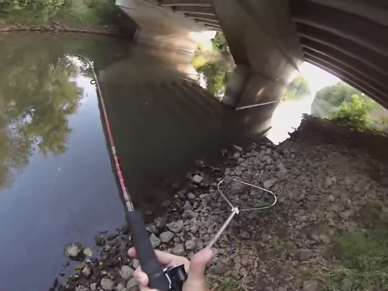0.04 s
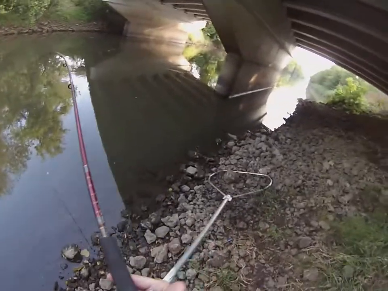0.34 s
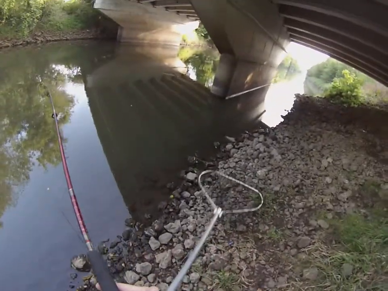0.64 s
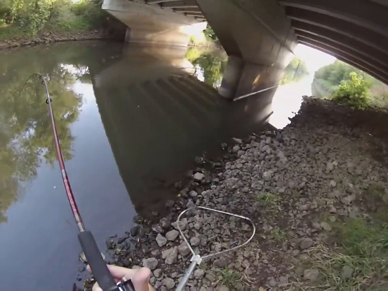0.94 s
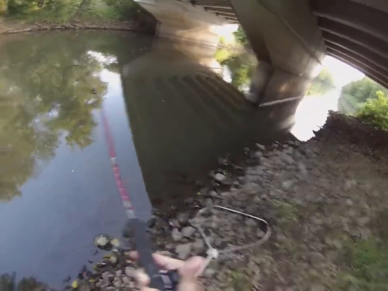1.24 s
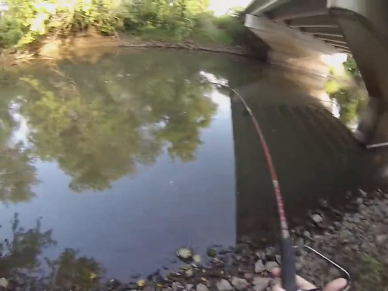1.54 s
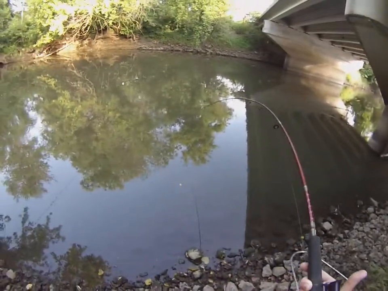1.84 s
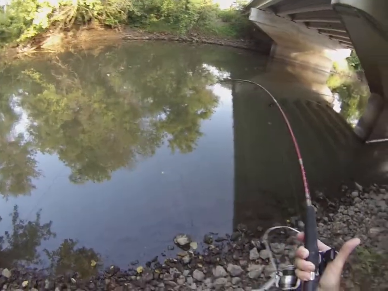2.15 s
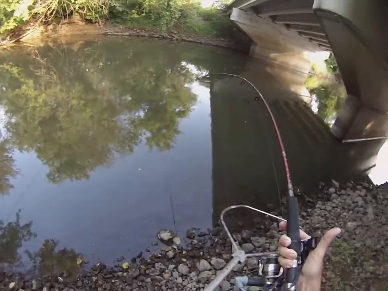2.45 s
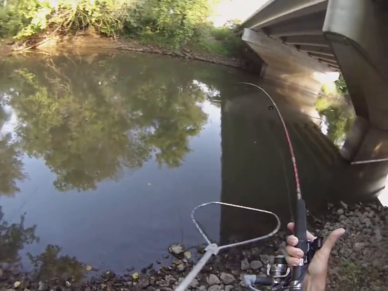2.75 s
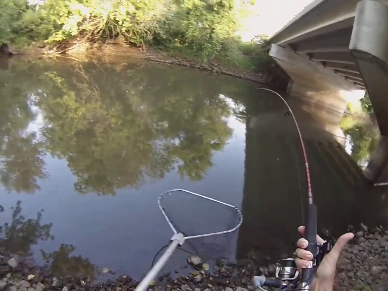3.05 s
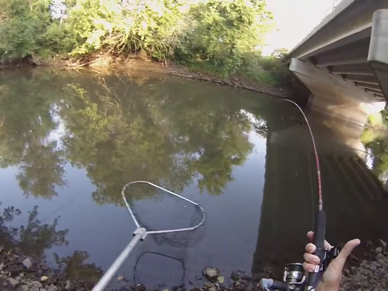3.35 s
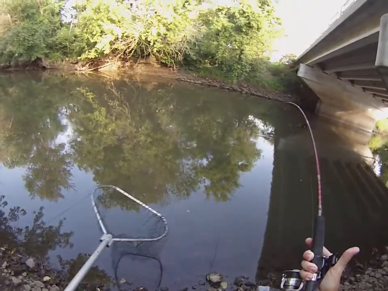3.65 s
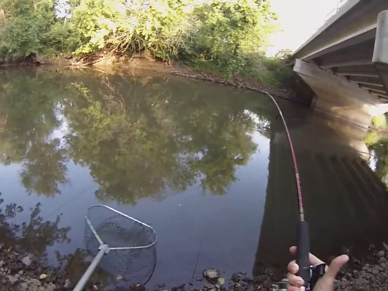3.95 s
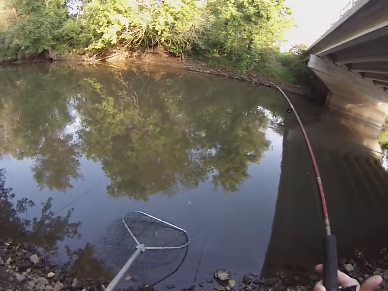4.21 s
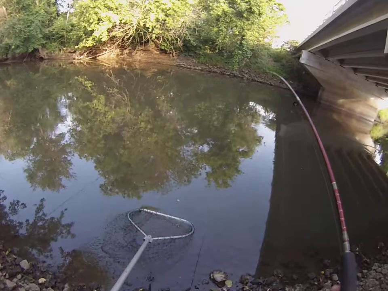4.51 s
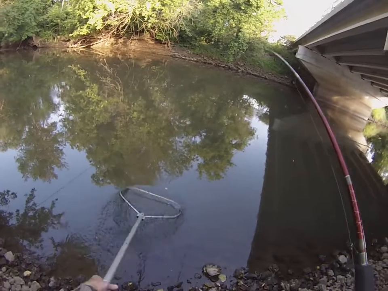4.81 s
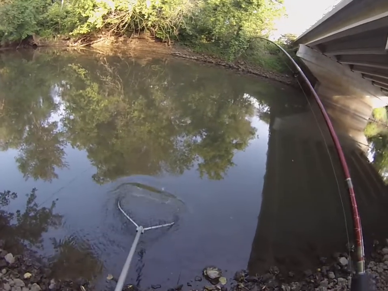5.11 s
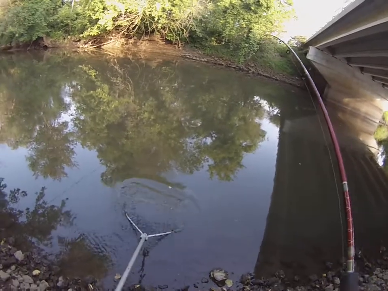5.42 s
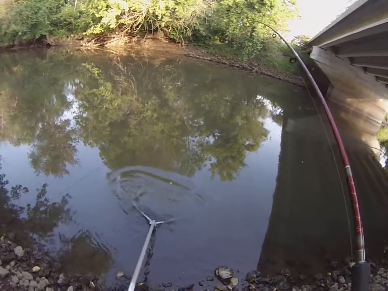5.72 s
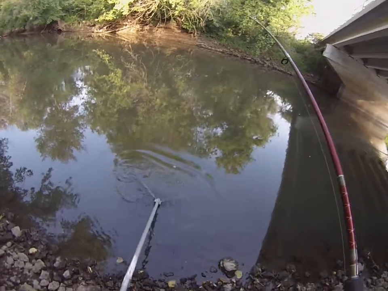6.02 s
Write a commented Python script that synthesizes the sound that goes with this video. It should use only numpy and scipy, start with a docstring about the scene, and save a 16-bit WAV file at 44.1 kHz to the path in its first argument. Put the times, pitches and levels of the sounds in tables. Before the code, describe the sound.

Close, sharp knocks and gritty scrapes come first as a landing net's hoop bumps across gravel beside a concrete bridge, with a slight echo. Tyre noise dies away and a breeze brushes the microphone. A quieter stretch holds soft fishing reel ticks, pebble clicks and faint distant birds, followed by a light splash with bubbles and several clacks of the metal pole.

```python
"""A landing net on a metal pole is dragged and knocked over riverbank stones, then dipped in the water.
Its hoop rattles in the socket, the mesh splashes and sheds bubbles, the pole clacks in the hand,
and a fishing reel's pawl ticks. A concrete bridge echoes every knock while its road noise fades.
Faint birds and an insect call from the far bank; a breeze puffs on the microphone."""
import sys
import numpy as np
from scipy import signal
from scipy.fft import rfft, irfft, next_fast_len
from scipy.io import wavfile
from scipy.ndimage import map_coordinates

SR = 44100
rng = np.random.default_rng(int(sys.argv[2]) if len(sys.argv) > 2 else 0)


def put_to_file(sound):
    """Save the sound as 16-bit audio at rate SR, in the file named by the first command-line argument."""
    columns = np.atleast_2d(sound).T  # one column per channel
    safe = np.clip(columns, -1, 1)
    whole_steps = np.round(safe * 32767)
    wavfile.write(sys.argv[1], SR, whole_steps.astype(np.int16))


N = 272095
TIME = np.arange(N) / SR
AGE = np.arange(SR // 2) / SR  # time since onset [s]


def amp(db):
    """Decibels to gain."""
    return 10 ** (np.asarray(db) / 20)


def unit(x):
    """Scale to rms 1."""
    return x / np.sqrt(np.mean(x ** 2) + 1e-20)


def along(points, hz):
    """Interpolate (frequency [Hz], value) on a log axis."""
    f, v = np.transpose(points)
    return np.interp(np.log(hz + 1), np.log(f + 1), v)


def gain_curve(rows):
    """(time [s], level [dB]) to gain per sample."""
    return amp(np.interp(TIME, *np.transpose(rows)))


def strokes(rows, attack_s, t60_s):
    """Rise-hold-decay gain from (start [s], length [s], level [dB])."""
    return sum(np.clip((TIME - s) / attack_s, 0, 1)
               * amp(db - 60 * np.maximum(TIME - s - length_s, 0) / t60_s) for s, length_s, db in rows)


def wobble(rate_hz):
    """Smooth random curve with knots at rate_hz."""
    return map_coordinates(rng.standard_normal(int(N * rate_hz / SR) + 4), [TIME * rate_hz])


def tone(pitch_hz):
    """Sine following a pitch curve."""
    return np.sin(2 * np.pi * np.cumsum(pitch_hz) / SR)


def add(track, s, sound):
    """Mix a sound in at time s."""
    part = track[max(round(s * SR), 0):][:len(sound)]
    part += sound[:len(part)]


def coloured(x, level_db):
    """Minimum-phase filter with gain level_db(hz)."""
    m = 2 * next_fast_len(len(x))
    cepstrum = irfft(level_db(np.fft.rfftfreq(m, 1 / SR)) * np.log(10) / 20)
    cepstrum[1:m // 2] *= 2
    cepstrum[m // 2 + 1:] = 0
    return irfft(rfft(x, m) * np.exp(rfft(cepstrum)))[:len(x)]


def shaped(x, spectrum):
    """Filter by (frequency [Hz], gain [dB]), then scale to rms 1."""
    return unit(coloured(x, lambda hz: along(spectrum, hz)))


def noise(spectrum):
    """Shaped Gaussian noise, rms 1."""
    return shaped(rng.standard_normal(N), spectrum)


def grains(size, spread_db):
    """Tiny slips of very unequal strength."""
    slips = rng.standard_normal(size)
    strength_db = spread_db * np.repeat(rng.standard_normal(size // 16 + 1), 16)[:size]
    return unit(slips * amp(strength_db))


def ring(modes):
    """Decaying modes, struck at new strengths each time."""
    strengths_db = rng.uniform(-2, 2, len(modes))
    return sum(amp(db + strength_db - 60 * AGE / t60_s) * np.sin(2 * np.pi * (hz * AGE + rng.random()))
               for (hz, db, t60_s), strength_db in zip(modes, strengths_db))


def contact(spectrum, t60_s, snap, uneven_db, body_db=0, edge_db=0):
    """A snap, then dying slips; body sets the lows, edge the treble. Each spot has its own resonances."""
    chatter = grains(len(AGE), spread_db=2.5) * amp(-60 * AGE / t60_s)
    chatter /= np.linalg.norm(chatter)
    chatter[0] += snap
    tilt = [(1200, body_db), (2000, 0.014), (3800, 0), (5500, edge_db)]
    spot_hz = np.arange(0, SR / 2, 300)
    spot_db = uneven_db * rng.standard_normal(len(spot_hz))
    hit = coloured(chatter,
                   lambda hz: along(spectrum, hz) + along(tilt, hz) + np.interp(hz, spot_hz, spot_db))
    return hit / np.std(hit[:SR // 200])  # rms 1 over the attack


def echo(x, decay, onset_s):
    """Diffuse tail; each frequency dies at its own rate."""
    hz, t, bands = signal.stft(rng.standard_normal(2 * SR), SR, nperseg=256)
    tail = signal.istft(bands * amp(-60 * t / along(decay, hz)[:, None]), SR, nperseg=256)[1]
    tail *= 1 - np.exp(-np.arange(len(tail)) / SR / onset_s)
    return signal.fftconvolve(x, tail / np.linalg.norm(tail))[:N]


def breeze():
    """Puffs buffet the microphone over steady open-air noise."""
    # puffs of air: (start [s], length [s], level [dB])
    puffs = [(0, 1.4, -52), (1.27, 0.32, -43), (1.635, 0.027, -41), (1.75, 0.056, -44), (1.9, 1.1, -62.5)]
    # buffeting and open-air spectra: (frequency [Hz], density [dB])
    buffet = [(12, -38), (22, 0), (45, 5), (81, -6), (134, 0.5), (214, -5), (409, -11.5), (500, -19.5),
              (650, -38), (1100, -120)]
    air = [(12, -42), (25, -1), (60, -8.5), (100, -5), (140, -9.5), (250, -13), (500, -16), (950, -17.5),
           (1500, -22.5), (2100, -24), (2700, -25.5), (3600, -25.5), (6000, -30.5), (9000, -37.5),
           (15500, -44)]
    gusts = strokes(puffs, attack_s=0.027, t60_s=0.44) * amp(2.0 + 2.26 * wobble(14))
    return gusts * noise(buffet) + amp(-57) * noise(air)


def traffic():
    """Fading tyre noise and a distant engine's firing drone."""
    # tyre spectrum: (frequency [Hz], density [dB])
    road = [(88, -42), (150, -15.5), (225, -14), (515, -11), (687, -6.5), (772, -4.5), (936, -1),
            (1430, -12.5), (1950, -11), (2860, -26), (3670, -27), (6430, -34), (15000, -60.5)]
    # tyre loudness: (time [s], level [dB])
    fade = [(0.0, -35), (0.46, -36), (0.88, -35.5), (0.99, -36), (1.56, -40), (2.11, -50), (3.63, -56.5),
            (5.07, -55.5), (6.17, -62)]
    tyres = gain_curve(fade) * amp(0.5 + 0.7 * wobble(5.09)) * noise(road)
    firing_hz = 90 + 1.47 * wobble(12)
    drone = tone(firing_hz) * amp(1.5 * wobble(10))
    return tyres + drone * gain_curve([(0, -58), (3, -58.5), (5.1, -54.5), (6.1, -61.5)])


def birds(syllable_hz=23):
    """Distant birds whistle short glides, twitter and lisp."""
    # whistles: (start [s], length [s], start pitch [Hz], end pitch [Hz], level [dB])
    notes = [(2.865, 0.049, 2844, 2510, -53), (3.057, 0.062, 2880, 2520, -51.5),
             (3.204, 0.11, 2060, 1974, -57), (4.147, 0.095, 3350, 3320, -60.5),
             (4.569, 0.043, 2400, 3100, -50.5), (4.663, 0.098, 4650, 3840, -61),
             (4.75, 0.064, 2960, 3355, -50.5), (4.911, 0.045, 3350, 3130, -52.5),
             (4.948, 0.06, 3030, 3090, -51.5)]
    # twitters and thin, high calls: (start [s], length [s], level [dB])
    twitters = [(3.12, 0.28, -59.5), (3.56, 0.062, -57.5)]
    lisps = [(3.39, 0.06, -73), (3.58, 0.054, -76)]
    out = np.zeros(N)
    for s, length_s, start_hz, end_hz, db in notes:
        progress = np.linspace(0, 1, int(length_s * SR))
        glide_hz = start_hz + (end_hz - start_hz) * progress
        waver = 1 + 0.018 * wobble(196)[:len(progress)]
        add(out, s, amp(db - 3.5) * np.sin(np.pi * progress) * tone(glide_hz * waver))
    twitter = tone(3500 + 330 * wobble(140)) * np.sin(np.pi * syllable_hz * TIME) ** 4
    out += twitter * strokes(twitters, attack_s=0.049, t60_s=0.4)
    lisp = noise([(6500, -54), (7600, -4), (8300, -9), (9200, -70)])
    return out + lisp * strokes(lisps, attack_s=0.037, t60_s=0.35)


def insect(pulse_hz=21):
    """An insect pulses on one narrow band."""
    # warm-up: (time [s], level [dB])
    swell = [(3.5, -94), (5.3, -78), (6.1, -83)]
    band = noise([(4900, -68), (5350, -1), (5550, 3), (6000, -56)])
    return band * (1 + 0.48 * np.sin(2 * np.pi * pulse_hz * TIME)) * gain_curve(swell)


def reel(tick_db=-44, scatter_db=2.8):
    """Pulled line spins the spool, which runs down; the pawl drops once a tooth and its spring rings."""
    # spool speed: (time [s], rate [teeth/s])
    spool = [(1.848, 17), (2.128, 27.6), (2.27, 27.4), (2.486, 19.5), (2.65, 10.5), (3.03, 3.5)]
    # one-tooth slips: (time [s], level [dB])
    tugs = [(3.467, -42.5), (3.926, -43), (4.002, -43), (4.0378, -43), (4.572, -46.5), (5.598, -46)]
    # spring modes: (frequency [Hz], level [dB], t60 [s])
    spring = [(3870, -12, 0.25), (4960, -7, 0.049), (6160, -2, .012), (7040, -12, .22), (7540, -4, 0.013)]
    pawl = [(2000, -21), (4500, -5.5), (7000, -5), (9000, -19), (15000, -21)]
    teeth = np.cumsum(np.interp(TIME, *np.transpose(spool), left=0, right=0)) / SR
    drops_s = TIME[1:][np.diff(np.ceil(teeth)) > 0]
    ticks = [(s, tick_db + scatter_db * rng.standard_normal()) for s in drops_s]
    out = np.zeros(N)
    for s, db in ticks + tugs:
        click = contact(pawl, t60_s=0.0074, snap=0.77, uneven_db=2)
        add(out, s, amp(db - 14.5) * click + amp(db - 12) * ring(spring))
    return out


def bubble(hz, rise_oct):
    """Trapped air rings, climbing in pitch near the surface; low or far-climbing bubbles last longer."""
    t60_s = 0.042 * (hz / 1000) ** -0.7 * (1 + 0.35 * rise_oct)
    pitch_hz = hz * 2 ** (rise_oct * np.minimum(AGE / t60_s, 1))
    return amp(-60 * AGE / t60_s) * (1 - np.exp(-AGE / 0.0033)) * tone(pitch_hz)


def water(small_bubbles=70):
    """The mesh slaps through the surface, flicks spray and sheds bubbles."""
    # mesh slaps: (start [s], length [s], level [dB])
    slaps = [(4.35, 0.077, -54), (4.422, 0.021, -51.5), (4.462, 0.025, -48), (4.565, 0.032, -55),
             (5.04, 0.13, -56)]
    # large bubbles: (time [s], pitch [Hz], level [dB], rise [octaves])
    bubbles = [(4.362, 1825, -29, 0.35), (4.430, 822, -30.5, 0.09), (4.440, 378, -37.5, 0.089),
               (4.456, 275, -37, 0.22), (4.458, 1350, -41, 1.4), (4.485, 643, -36.5, .9),
               (4.598, 1000, -41, 3.6), (4.835, 1850, -41, 0.9), (5.133, 810, -35, 0.13)]
    spray = [(190, -22), (310, 4), (900, 4), (2000, -3), (4000, -19), (7000, -10.5), (10000, -22),
             (15000, -35)]
    splash = strokes(slaps, attack_s=0.012, t60_s=0.12)
    droplets = grains(N, spread_db=8) * amp(4.5 * wobble(160))
    out = splash * amp(-1.5) * shaped(droplets, spray)
    for s, hz, db, rise_oct in bubbles:
        add(out, s, amp(db) * bubble(hz, rise_oct))
    for when, height in rng.random((small_bubbles, 2)):
        s, hz = 4.34 + 0.32 * when, 700 * 8 ** height
        add(out, s, splash[int(s * SR)] * amp(10.5) * bubble(hz, rise_oct=0.32))
    return out


def pole():
    """The pole clacks in the hand; fuller clacks ring it harder."""
    # clacks: (time [s], level [dB], body [dB])
    clacks = [(4.9782, -31, 13), (4.9831, -32.5, 2.5), (5.207, -39, 4), (5.251, -43, 3), (5.263, -38, 0),
              (5.448, -49.5, -5), (5.469, -37, -2.5), (5.481, -44, 11), (5.551, -47, -3.5)]
    # clack spectrum: (frequency [Hz], density [dB])
    spectrum = [(100, -24), (200, -16), (310, -3), (600, -3), (1000, 7), (1500, -2), (2000, 2),
                (3500, -4.5), (5000, -15), (9000, -16), (12500, -30), (15500, -41)]
    # pole modes: (frequency [Hz], level [dB], t60 [s])
    modes = [(284, -7.5, 0.33), (570, -2, 0.1), (677, 1, 0.053), (905, 5.5, 0.045)]
    out = np.zeros(N)
    for s, db, body_db in clacks:
        clack = contact(spectrum, t60_s=0.039, snap=0.28, uneven_db=4.5, body_db=body_db, edge_db=5)
        add(out, s, amp(db - 1.5) * clack + amp(db + body_db - 16.5) * ring(modes))
    return out


def hoop_rattle():
    """Jolted, the loose hoop strikes its socket, swings across and lands twice."""
    # jolts: (time [s], level [dB])
    jolts = [(0.7901, -23), (0.809, -23.5), (0.8308, -20.5), (1.732, -25.5), (5.2051, -25.5), (5.2135, -26)]
    # strikes per jolt: (delay [s], gain [dB])
    swing = [(0, 0.5), (0.037, -2), (0.0479, -2.5)]
    # hoop modes: (frequency [Hz], level [dB], t60 [s])
    modes = [(1970, -4, 0.026), (3113, 1.5, 0.054), (3330, -10, 0.045), (3645, -7.5, 0.03),
             (4770, -12, 0.03), (8740, -18.5, 0.11), (8740, -26, 0.04)]
    socket = [(200, -13.5), (1200, 8.5), (2000, 4), (3500, -16), (6000, -8), (15000, -27)]
    strikes = [(s + delay_s, db + gain_db) for s, db in jolts for delay_s, gain_db in swing]
    out = np.zeros(N)
    for s, db in strikes:
        add(out, s, amp(db - 16) * contact(socket, t60_s=0.069, snap=0.22, uneven_db=4))
        for bounce in range(3):  # weaker rebounds break up the ring
            add(out, s + bounce * rng.uniform(0.002, 0.004), amp(db - 9.5 - 4.7 * bounce) * ring(modes))
    return out


def pebbles():
    """Unsettled pebbles click; fuller clicks are duller."""
    # clicks: (time [s], level [dB], body [dB])
    clicks = [(2.1528, -42, 10), (2.1957, -42, 12), (2.28, -43.5, 8), (2.3165, -49.5, -8),
              (2.3875, -27.5, -19), (2.4108, -41.5, 6), (2.5022, -45.5, -21)]
    # pebble spectrum: (frequency [Hz], density [dB])
    spectrum = [(200, -5), (1000, -5), (1900, 5.5), (2550, -0.5), (3600, 3.5), (4600, -4), (5600, -12),
                (8000, -32), (15000, -54)]
    out = np.zeros(N)
    for s, db, body_db in clicks:
        click = contact(spectrum, t60_s=0.0086, snap=0.36, uneven_db=0.7,
                        body_db=body_db, edge_db=-14 - 0.55 * body_db)
        add(out, s, amp(db + 1) * click)
    return out


def gravel():
    """The dragged hoop grinds over gravel and digs in until it gives way."""
    # drags: (start [s], length [s], level [dB])
    drags = [(0, 0.46, -41.5), (0.58, 0.19, -41.5), (0.775, 0.11, -28.5), (0.95, 0.023, -43),
             (1.17, 0.18, -44.5), (1.765, 0.031, -40), (1.875, 0.02, -42.5)]
    # crunches: (peak time [s], half length [s], level [dB])
    crunches = [(0.203, 0.0043, -35), (0.455, 0.0086, -18.5), (0.944, 0.0081, -20)]
    # scraped and crushed gravel spectra: (frequency [Hz], density [dB])
    scraped = [(180, -62), (300, -8), (430, -27), (482, -9), (680, -7.5), (1060, 5), (1490, -20),
               (2070, -8), (2560, -23), (3170, -12), (4250, -25), (8740, -31), (15000, -58)]
    crushed = [(150, -22.5), (400, -16), (600, -2.5), (1000, -4.5), (1500, -11), (2500, -12), (3600, -10.5),
               (4500, -18), (7000, -20), (9500, -28.5), (15500, -50)]
    slips = grains(N, spread_db=5) * amp(0.88 * wobble(71.1))
    scrape = strokes(drags, attack_s=0.02, t60_s=0.079) * shaped(slips, scraped)
    digging = sum(amp(db) * np.exp(-0.5 * ((TIME - s) / half_s) ** 2) for s, half_s, db in crunches)
    return scrape + digging * shaped(grains(N, spread_db=4.5), crushed)


def stone_knocks(heavy_db=-16, dulling_db_per_db=4.3):
    """The hoop knocks on stones, and once the pole thumps the net; the heaviest knocks are dull and lose
    treble."""
    # knocks, the one at 0.935 s being the pole thumping the net: (time [s], level [dB], body [dB])
    knocks = [(0.0368, -21.5, 0.5), (0.0875, -18, 3), (0.1005, -26, -3.5), (0.124, -23.5, -3),
              (0.168, -19.5, -13), (0.22, -27.5, -11), (0.305, -17.5, -4), (0.3155, -31.5, -2),
              (0.582, -26, 9), (0.7885, -26, 2.5), (0.8655, -25, -2), (0.905, -15, -5.5), (0.917, -18, 11),
              (0.935, -10, 11), (1.1745, -26, 0), (1.2095, -21, -1)]
    # stone spectrum: (frequency [Hz], density [dB])
    spectrum = [(100, -49), (300, -14), (450, -13), (620, -6.5), (1000, 4), (1500, -4.5), (2000, -5),
                (2600, -8.5), (3500, -5), (5000, -14.5), (7000, -18), (9500, -37.5), (15500, -48)]
    out = np.zeros(N)
    for s, db, body_db in knocks:
        edge_db = -dulling_db_per_db * max(db - heavy_db, 0)
        knock = contact(spectrum, t60_s=0.046, snap=0.23, uneven_db=2.5, body_db=body_db, edge_db=edge_db)
        add(out, s, amp(db - 1) * knock)
    return out


def scene():
    """Net sounds scatter off the bank and roll on under the bridge; far calls arrive smeared."""
    # bank and bridge reverberation: (frequency [Hz], t60 [s])
    bank = [(200, 0.34), (2500, 0.25), (6000, 0.23), (12000, 0.31)]
    bridge = [(150, 1.2), (500, 3.6), (1000, 3.2), (2500, 1.06), (5000, 0.76), (12000, 2.6)]
    net = gravel() + stone_knocks() + pebbles() + pole() + hoop_rattle() + water()
    calls = birds() + insect()
    far = calls + amp(-2.5) * echo(calls, bank, onset_s=0.0035)
    far += amp(1.5) * echo(calls, bridge, onset_s=0.026)
    echoes = amp(-10) * echo(net, bank, onset_s=0.013) + amp(-24) * echo(net, bridge, onset_s=0.14)
    return (net + echoes + reel() + far + traffic() + breeze())[None]


def record(dry):
    """Brick-wall low-pass."""
    top_hz = 15550
    m = next_fast_len(N + SR // 2)
    return irfft(rfft(dry, m) * (np.fft.rfftfreq(m, 1 / SR) < top_hz), m)[..., :N]


dry = scene()
out = record(dry)
put_to_file(out)
```